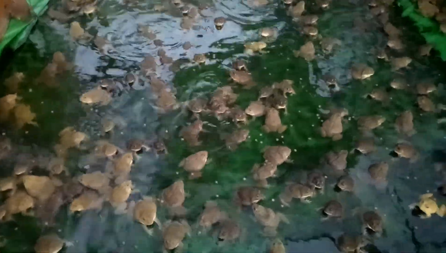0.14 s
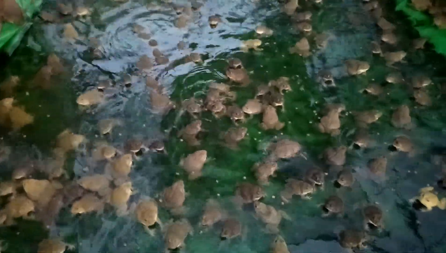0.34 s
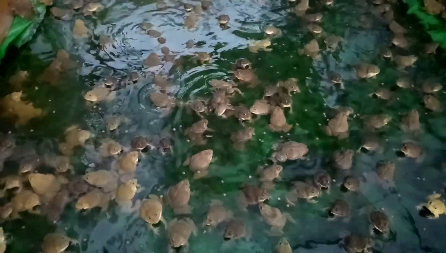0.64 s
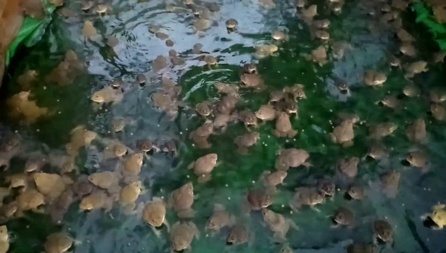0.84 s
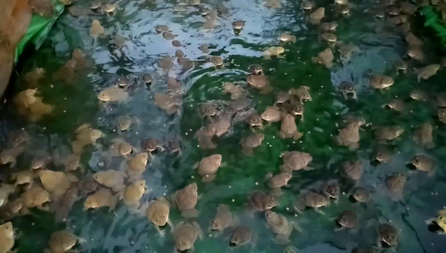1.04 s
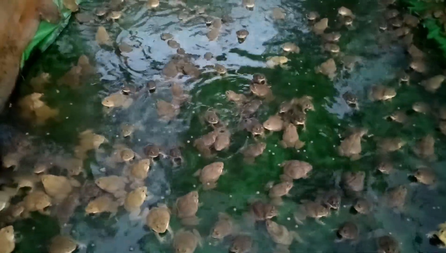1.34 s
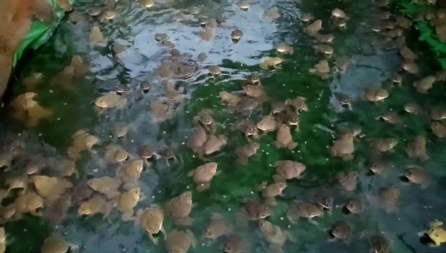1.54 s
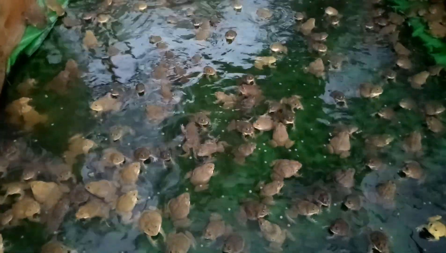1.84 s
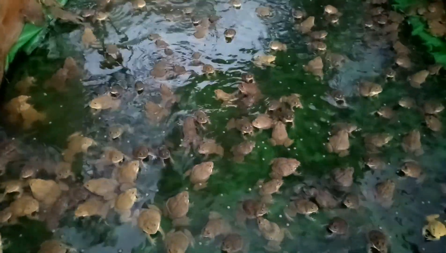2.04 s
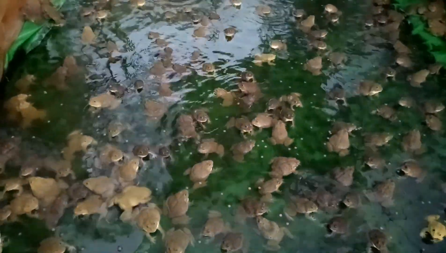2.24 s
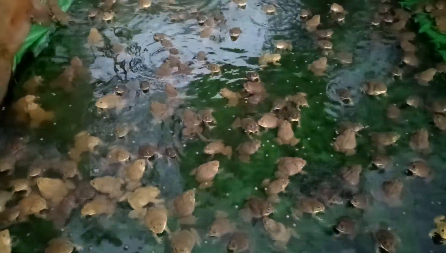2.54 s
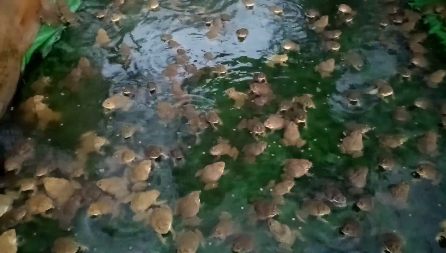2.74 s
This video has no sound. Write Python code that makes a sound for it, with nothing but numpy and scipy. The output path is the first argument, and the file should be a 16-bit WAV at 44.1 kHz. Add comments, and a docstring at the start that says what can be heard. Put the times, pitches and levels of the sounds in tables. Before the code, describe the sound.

Frogs splashing in a shallow pond, hollow slaps, sloshes and bubbly drips, dull and close, left side

```python
"""Shallow pond: frogs scramble through the water, left of centre almost entirely.
Slaps and drips push a shared set of short, hollow resonances; sloshing rings them with clumps of
tiny random impacts. Bubbles are decaying sines of rising pitch, most of them tiny fizz.
A low-pass muffles all of these; bursts of spray noise stay crisp. Faint hiss and rumble lie beneath.
"""
import sys
import numpy as np
from scipy import signal
from scipy.fft import rfft, irfft
from scipy.io import wavfile

SR = 44100
rng = np.random.default_rng(int(sys.argv[2]) if len(sys.argv) > 2 else 0)


def unload_audio(sound):
    """Save the sound as a 16-bit wav file, at the path given as the first command line argument."""
    columns = np.transpose(np.atleast_2d(sound))
    # keep every value between -1 and 1, then stretch to whole-number steps
    steps = np.round(np.clip(columns, -1, 1) * 32767)
    wavfile.write(sys.argv[1], SR, steps.astype(np.int16))


N = 125685


def undb(db):
    """Decibels to amplitude gain."""
    return 10 ** (np.asarray(db) / 20)


def unit(x):
    """Scale to rms 1."""
    return x / np.sqrt(np.mean(x ** 2))


def butter(x, hz, kind, order):
    """Butterworth low-pass or high-pass."""
    return signal.sosfilt(signal.butter(order, min(hz, .45 * SR), kind, fs=SR, output="sos"), x)


def noise(spectrum):
    """Gaussian noise of rms 1, shaped by (freq_hz, density_db) points joined over log frequency."""
    points_hz, points_db = np.array(spectrum).T
    freq_hz = np.maximum(np.arange(N // 2 + 1) * SR / N, 1)
    gain = undb(np.interp(np.log(freq_hz), np.log(points_hz), points_db))
    return unit(irfft(rfft(rng.standard_normal(N)) * gain, N))


def add(out, start_s, x):
    """Mix x into out at start_s, cut at the end."""
    i = max(int(start_s * SR), 0)
    out[i:i + len(x)] += x[:max(N - i, 0)]


def ring(hz, t60_s, size=2048):
    """Damped sine of unit energy: one resonance struck once."""
    t = np.arange(size) / SR
    y = np.sin(2 * np.pi * hz * t) * np.exp(-np.log(1000) * t / t60_s)
    return y / np.sqrt(np.sum(y ** 2))


def level_at(hz, bands_hz, levels_db):
    """Level at one frequency, interpolated between bands over log frequency."""
    return np.interp(np.log(hz), np.log(bands_hz), levels_db)


# quiet floor spectrum: freq_hz, relative density_db (per Hz)
FLOOR_SPECTRUM = [(25, -15.5), (90, 6.5), (450, -15.5), (2000, -17), (4500, -21), (6000, -27.5)]
FLOOR_DB = -74.5


def floor():
    """Steady shaped noise, drawn anew for each side."""
    return undb(FLOOR_DB) * noise(FLOOR_SPECTRUM)


# hiss spectrum: freq_hz, relative density_db (per Hz)
HISS_SPECTRUM = [(300, -2.5), (700, -13.5), (1000, -16), (1500, -16.5), (2700, -16.5), (3150, -0.5),
                 (3500, -25.5), (4200, -9), (4750, 0), (5300, -11), (5650, -21), (8000, -41)]
# rumble spectrum: freq_hz, relative density_db (per Hz)
RUMBLE_SPECTRUM = [(35, -24.5), (70, -4.5), (155, 6.5), (200, -9), (330, -13.5), (1100, -75.5)]
# rumble envelope: time_s, level_db
RUMBLE_LEVEL = [(0, -60), (.16, -55), (0.531, -54), (0.699, -61), (1.75, -62.5), (2.0, -51.5),
                (2.15, -63.5), (2.501, -58), (2.85, -56.5)]
HISS_DB = -60


def background():
    """Steady hiss plus low noise that swells and sinks."""
    time_s, level_db = np.array(RUMBLE_LEVEL).T
    rumble_gain = undb(np.interp(np.arange(N) / SR, time_s, level_db))
    return undb(HISS_DB) * noise(HISS_SPECTRUM) + rumble_gain * noise(RUMBLE_SPECTRUM)


# bursts of flung spray: start_s, level_db, decay_s (to 1/e)
SPRITZES = [(0.298, -54.5, 0.022), (0.38, -55, 0.016), (1.138, -54.5, 0.01), (2.095, -56, 0.024),
            (2.309, -59, 0.06), (2.4945, -38, 0.0013), (2.794, -55.5, .015)]
# spray spectrum: freq_hz, relative density_db (per Hz)
SPRITZ_SPECTRUM = [(2500, -18), (6000, 0), (9500, -23), (15000, -33)]
SPRITZ_GRAIN_HZ = 244  # cutoff of the sputter


def spritzes():
    """Flung spray: decaying bright noise, sputtering under slower random modulation."""
    envelope, t = np.zeros(N), np.arange(N) / SR
    for start_s, level_db, decay_s in SPRITZES:
        add(envelope, start_s, undb(level_db) * np.exp(-t / decay_s))
    sputter = unit(butter(rng.standard_normal(N), SPRITZ_GRAIN_HZ, "low", order=2))
    return envelope * noise(SPRITZ_SPECTRUM) * sputter


FIZZ_PER_S, FIZZ_DB, FIZZ_T60_S = 60, 0.5, 0.051  # FIZZ_DB: re sloshing
FIZZ_LOW_HZ, FIZZ_HIGH_HZ = 596.6, 2806


def fizz():
    """Tiny bubbles at random times, levels following the sloshing; rows as in BUBBLES."""
    time_s, bass_db, treble_db = np.array(SLOSH).T
    rows = []
    for when, pitch, size in rng.random((int(FIZZ_PER_S * N / SR), 3)):
        start_s = when * N / SR
        pitch_hz = FIZZ_LOW_HZ * (FIZZ_HIGH_HZ / FIZZ_LOW_HZ) ** pitch
        bands_db = [np.interp(start_s, time_s, band_db) for band_db in (bass_db, treble_db)]
        slosh_db = level_at(pitch_hz, SLOSH_BANDS_HZ, bands_db)
        rows.append((start_s, pitch_hz, slosh_db + FIZZ_DB + 10 * (size - .5), FIZZ_T60_S))
    return rows


# single bubbles: start_s, pitch_hz (at start), level_db (envelope peak before wobble), t60_s
BUBBLES = [(.06, 416, -37, 0.11), (0.121, 3240, -45, 0.049), (0.197, 1405, -36, 0.037),
           (0.23, 733, -34.5, 0.022), (.271, 2070, -34.5, 0.036), (1.32, 1550, -31.5, .018),
           (1.74, 4540, -41, 0.022), (1.918, 3550, -45, 0.035), (1.94, 1760, -43, 0.12),
           (2.003, 1113, -38, 0.026), (2.013, 667, -28.5, 0.016), (2.184, 997, -35.5, 0.02),
           (2.803, 3440, -31.5, 0.01)]
BUBBLE_RISE_PER_S, BUBBLE_ATTACK_S = 3, 0.0034  # rise: fraction of start pitch per second
BUBBLE_ROUGH = .7  # rms of the level wobble, relative


def bubbles(size=5000):
    """Each bubble is a damped sine of rising pitch and unsteady level."""
    out, t = np.zeros(N), np.arange(size) / SR
    for start_s, pitch_hz, level_db, t60_s in list(BUBBLES) + fizz():
        wobble = 1 + BUBBLE_ROUGH * unit(butter(rng.standard_normal(size), pitch_hz / 6, "low", order=2))
        envelope = (1 - np.exp(-t / BUBBLE_ATTACK_S)) ** 2 * np.exp(-np.log(1000) * t / t60_s)
        envelope /= envelope.max()
        phase = 2 * np.pi * np.cumsum(pitch_hz * (1 + BUBBLE_RISE_PER_S * t)) / SR
        add(out, start_s, undb(level_db) * envelope * wobble * np.sin(phase))
    return out


# hollow resonances, rung by slosh and slaps: freq_hz, t60_s, relative level_db
MODES = [(360, 0.016, -7), (509, 0.022, 1), (743, 0.006, -10), (989, 0.0035, -2), (1407, 0.0064, -2),
         (2018, 0.011, 2), (2616, 0.0088, -1.5), (3020, 0.0063, 1), (3880, 0.0034, -2)]
# sloshing envelope: time_s, bass_db, treble_db (before SLOSH_DB)
SLOSH = [(0, -50, -56), (.07, -42, -67), (.17, -70, -58), (.24, -45, -54), (.31, -31.5, -38),
         (.42, -34, -44.5), (.51, -28.5, -42), (.575, -40, -46), (.635, -31.5, -38.5), (.74, -41.5, -42),
         (.81, -54, -47.5), (.87, -46, -46), (1.03, -50, -44), (1.11, -40, -38.5), (1.18, -46, -49),
         (1.235, -32, -52), (1.32, -45, -47), (1.39, -49.5, -57), (1.44, -46.5, -48), (1.54, -53, -59),
         (1.64, -50.5, -59), (1.713, -65, -57.5), (1.748, -78, -63.5), (1.905, -65.5, -103.5),
         (1.962, -82, -49), (2.02, -44, -51.5), (2.11, -43, -48.5), (2.19, -43, -51.5), (2.3, -39.5, -52.5),
         (2.48, -50.5, -55.5), (2.61, -46, -56.5), (2.7, -65, -69.5), (2.85, -61, -78)]
# bass and treble centres: freq_hz
SLOSH_BANDS_HZ = [520, 3040]
DROPS_PER_S, DROP_SPREAD_DB, SLOSH_DB = 2200, 2, -3.5  # impact rate at the strongest sloshing
THINNING = .85  # dB of rate per dB of effort
CLUMP_DB, CLUMP_HZ = 2.2, 55  # rms and cutoff of the clumping
WASH = .25  # steady noise, rms re impacts


def slosh():
    """Churned water: clumped impacts over a faint wash ring the modes; impacts thin out in calm."""
    t, curve, out = np.arange(N) / SR, np.array(SLOSH), np.zeros(N)
    time_s = curve[:, 0]
    effort_db = np.interp(t, time_s, curve[:, 1:].mean(axis=1))
    drops_per_s = DROPS_PER_S * undb(THINNING * (effort_db - effort_db.max()))
    sizes = undb(DROP_SPREAD_DB * np.minimum(rng.exponential(size=N), np.pi))
    hits = rng.random(N) < drops_per_s / SR
    drops = hits * sizes / np.sqrt(drops_per_s)  # offsets the rate's effect on power
    clumps = undb(CLUMP_DB * unit(butter(rng.standard_normal(N), CLUMP_HZ, "low", order=2)))
    for freq_hz, t60_s, mode_db in MODES:
        impacts = unit(clumps * drops * rng.uniform(-1.12, 1, N))
        grain = unit(impacts + WASH * rng.standard_normal(N))
        levels_db = [level_at(freq_hz, SLOSH_BANDS_HZ, row[1:]) for row in curve]
        pushes = grain * undb(np.interp(t, time_s, levels_db) + mode_db + SLOSH_DB)
        out += signal.fftconvolve(pushes, ring(freq_hz, t60_s))[:N]
    return out


# single slaps and drips: start_s, thud_db, knock_db, ping_db, tick_db (before mode levels)
SLAPS = [(0.2314, -31.5, -43, -50, -49), (0.3123, -30, -39, -29.5, -38.5), (0.3815, -30, -29, -43, -34),
         (0.4415, -33, -32, -41, -52.0), (0.509, -53, -47, -53, -35.5), (0.5432, -34, -34, -37.5, -34),
         (0.5997, -34.5, -32.5, -34.5, -41), (0.7499, -29.5, -35, -32.0, -33.5),
         (0.7684, -39.5, -60, -43, -33.5), (0.9318, -29.5, -38, -38.5, -51),
         (0.9615, -41.5, -39.5, -36, -34.5), (0.9838, -60, -32, -41.5, -31.5),
         (1.0205, -39.5, -35.5, -42, -57), (1.121, -61, -38, -44, -35.5), (1.1412, -59, -33.5, -36.0, -32),
         (1.1821, -56, -28, -47, -32.5), (1.211, -71, -29.5, -32, -33), (1.2637, -51, -30.5, -31, -26.5),
         (1.2992, -23.5, -28, -37, -40.5), (1.3175, -37.5, -32, -35.5, -44),
         (1.445, -37.5, -27, -32.5, -41.5), (1.487, -80.5, -44, -32, -46), (1.4958, -71, -42.5, -31, -35),
         (1.6045, -25.5, -27, -25.5, -34.5), (1.6381, -47, -34, -48, -46.5),
         (1.6514, -55, -42, -45.5, -48.0), (1.7094, -61, -72, -45.5, -47.5),
         (2.1005, -36.5, -34.5, -26.0, -28), (2.1185, -39, -34, -43, -33),
         (2.1726, -35.5, -38.5, -41.5, -44.5), (2.2124, -53, -59, -37, -47), (2.222, -56, -43, -36.0, -34),
         (2.2613, -59, -39.5, -35.0, -31), (2.2929, -38.5, -40, -34.5, -41.5),
         (2.321, -39.5, -62, -38, -45), (2.3885, -46, -40, -42.5, -48.0), (2.453, -47.5, -39, -47, -54),
         (2.493, -50.5, -43.5, -45.5, -41.5), (2.5563, -38, -40, -55, -43.5), (2.5761, -41, -41, -57, -51)]
# thud, knock, ping and tick centres: freq_hz
SLAP_BANDS_HZ = [540, 1190, 2180, 3240]
SPRAY_DB, SPRAY_S = -8, 0.0058  # energy re the push; decay to 1/e
SLAP_S = 0.0079  # time over which a slap's level is taken
SLAP_DETUNE = .025  # rms, relative


def slaps():
    """Each slap is one impulse on the slightly detuned modes, trailed by a decaying spiky spray."""
    out = np.zeros(N)
    for start_s, *levels_db in SLAPS:
        detune = 1 + SLAP_DETUNE * rng.standard_normal(len(MODES))
        body = 0
        for k, (freq_hz, t60_s, mode_db) in enumerate(MODES):
            gain = undb(mode_db + level_at(freq_hz, SLAP_BANDS_HZ, levels_db))
            body = body + (-1) ** k * gain * ring(freq_hz * detune[k], t60_s)
        t = np.arange(len(body)) / SR
        push = rng.standard_normal(len(t)) ** 3 * np.exp(-t / SPRAY_S)
        push *= undb(SPRAY_DB) / np.sqrt(np.sum(push ** 2))
        push[0] += 1
        add(out, start_s, signal.fftconvolve(body, push) * np.sqrt(SLAP_S * SR))
    return out


MUFFLE_HZ, LOW_CUT_HZ = 5010, 386


def muffle(water):
    """Steep low-pass dulls the water; high-pass thins it."""
    return butter(butter(water, MUFFLE_HZ, "low", order=6), LOW_CUT_HZ, "high", order=3)


RIGHT_DB, RIGHT_TOP_HZ = -31, 650


def scene():
    """Water, spray and background on the left, a dull trace on the right, a floor on each side."""
    left = muffle(slaps() + slosh() + bubbles()) + spritzes() + background()
    right = undb(RIGHT_DB) * butter(left, RIGHT_TOP_HZ, "low", order=2)
    return np.array([side + floor() for side in (left, right)])


TOP_HZ = 15400


def record(dry):
    """Steep elliptic low-pass cuts the top."""
    return signal.sosfilt(signal.ellip(8, .2, 70, TOP_HZ, fs=SR, output="sos"), dry)


dry = scene()
out = record(dry)
unload_audio(out)
```